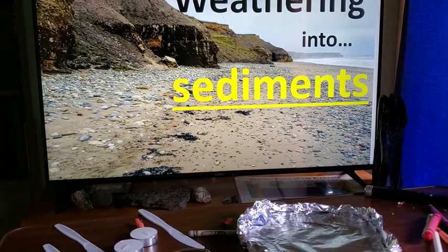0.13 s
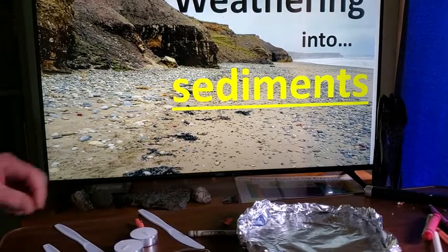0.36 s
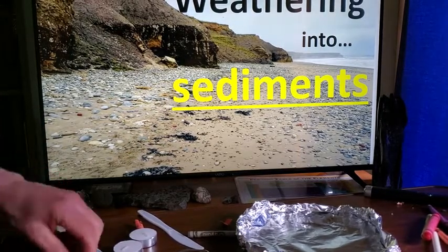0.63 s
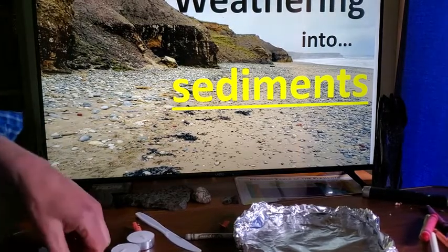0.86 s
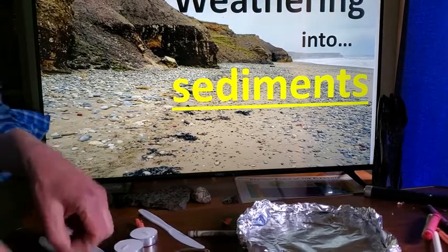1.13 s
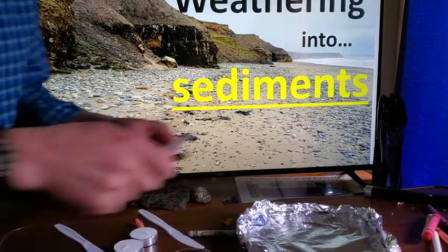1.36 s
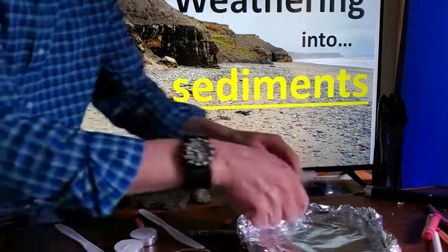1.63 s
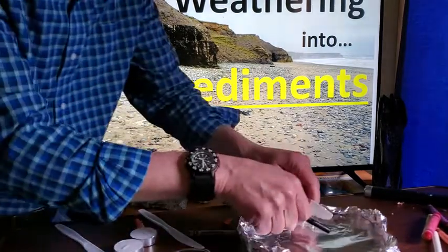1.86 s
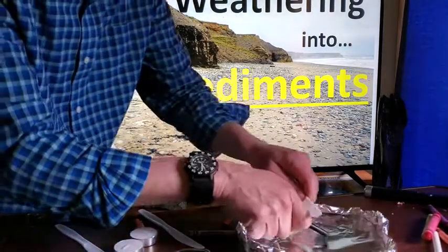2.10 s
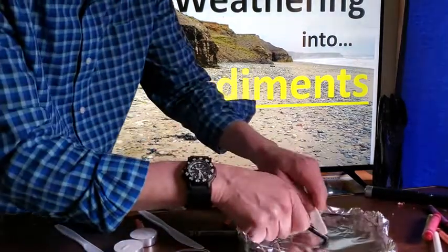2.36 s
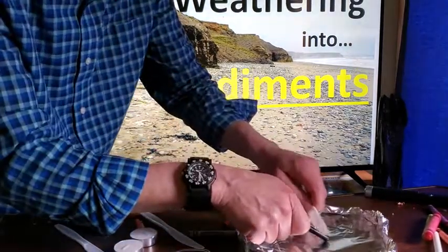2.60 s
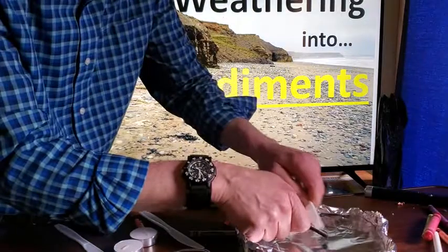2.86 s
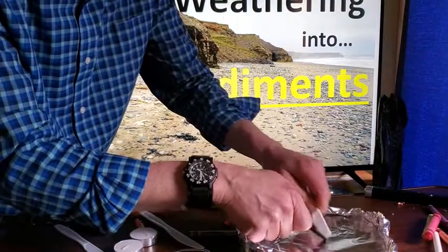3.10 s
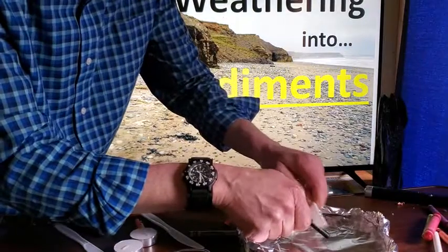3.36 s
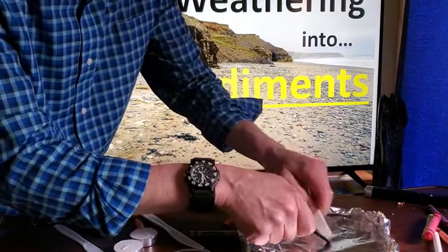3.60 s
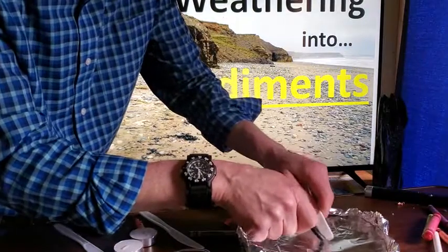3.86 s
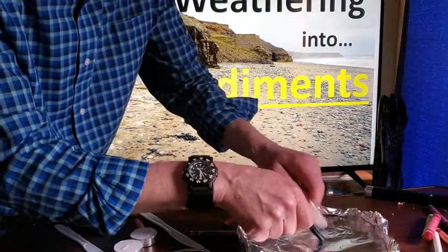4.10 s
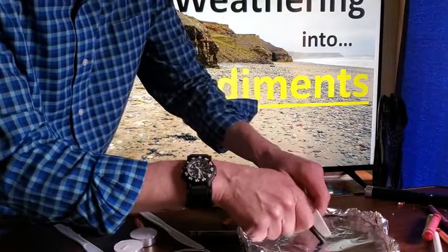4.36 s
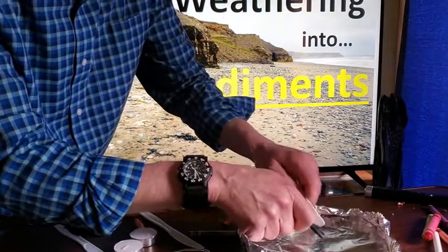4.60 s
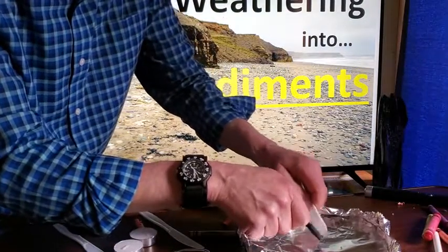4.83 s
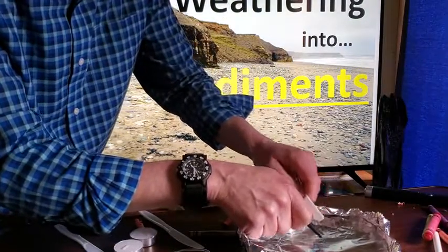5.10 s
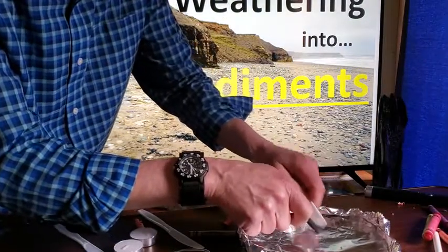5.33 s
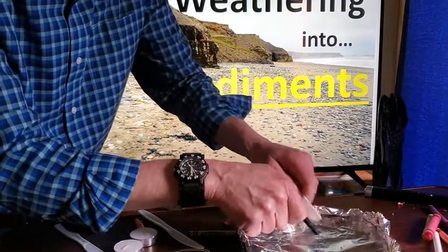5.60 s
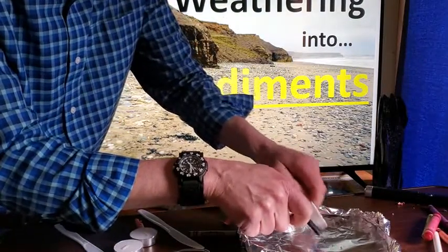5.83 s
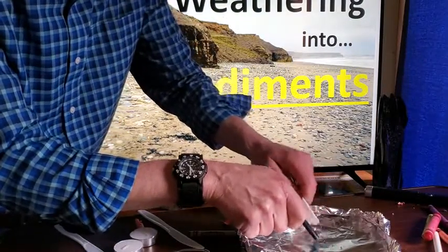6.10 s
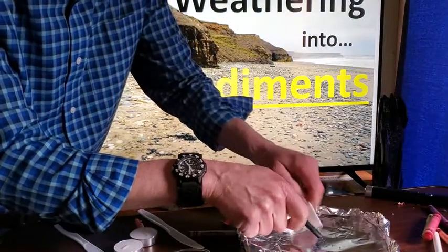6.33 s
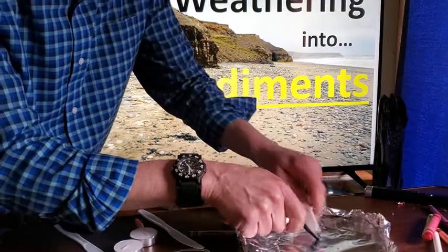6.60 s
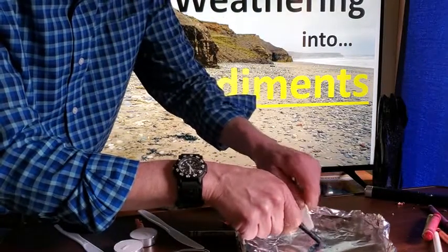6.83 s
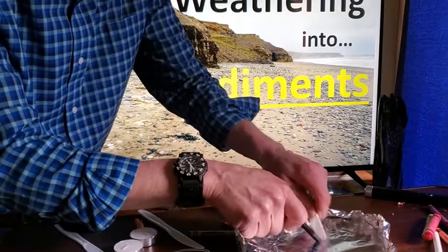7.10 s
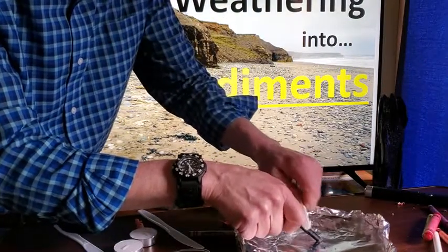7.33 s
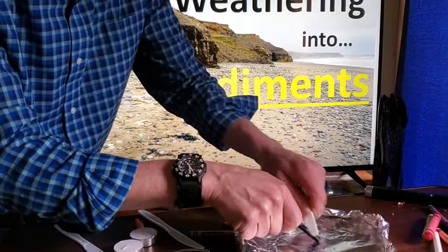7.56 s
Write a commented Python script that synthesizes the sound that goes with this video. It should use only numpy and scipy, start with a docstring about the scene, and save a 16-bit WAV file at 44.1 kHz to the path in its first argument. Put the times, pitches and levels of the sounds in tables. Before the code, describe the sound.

Close stereo microphones in a small furnished room, with soft hiss and a very faint low fan hum throughout, plus a barely audible wavering tone that fades by about 3 s. From 0 to 0.4 s, faint dragging and soft low table thuds. At 0.5-0.75 s, a loose cluster of light knocks, knuckle bumps and sliding plastic on wood; at 1.0-1.1 s, sharper, louder, bright plastic clacks. Soft low bumps follow near 1.4-1.5 s. From 1.8 s, a plastic knife scrapes wax on crumpled foil: strong rasps at first, settling into about six strokes a second, each a snap with gritty tearing and crinkly rustle. Between 3.7 and 6.1 s strokes are mostly lighter and more ticking, with tiny hollow moans around 5.2-5.9 s. A hard, bright bite comes near 6.46 s, then denser scraping continues to the end around 7.7 s.

```python
"""A plastic knife scrapes a wax crayon lying on crumpled foil, about six strokes a second, close to a pair of mics.
Each catch of the blade cracks in struck modes and a noise snap, then tears dense grains out of wax and foil.
Before that the knife is dragged off a table as grains through resonances, and clacks in two loose clusters.
The table thuds under the hands as resonant noise and short low tones.
A small furnished room adds dense echoes; behind it lie hiss, a fan hum and a faint wavering tone."""
import sys
import numpy as np
from scipy import signal
from scipy.fft import rfft, irfft
from scipy.io import wavfile

SR = 44100
rng = np.random.default_rng(int(sys.argv[2]) if len(sys.argv) > 2 else 0)


def convert_level_to_amplitude(level_db):
    """Map a level in decibels to its linear amplitude factor."""
    exponent = np.asarray(level_db, float) / 20
    return 10 ** exponent


def waveform_to_disk(signal):
    """Save audio, clipped to [-1, 1], as 16-bit WAV at the path in sys.argv[1]."""
    frames = np.transpose(np.atleast_2d(signal))
    scaled = np.clip(frames, -1, 1) * 32767
    samples = np.round(scaled).astype(np.int16)
    wavfile.write(sys.argv[1], SR, samples)


N = 339570   # samples, 7.7 s

# ringing modes of the plastic knife: f/Hz, relative level/dB, t60/s
KNIFE_MODES = [(756, -12.5, 0.015), (1305, -2, 0.05), (2260, -18, 0.014), (3125, -11.5, 0.048),
               (3427, -2, 0.029), (3733, 3, 0.021), (4000, -3, 0.029), (4220, -3, 0.021),
               (6880, -11, 0.0036)]
# resonances of the wooden table top: f/Hz, width/Hz, relative level/dB
WOOD_MODES = [(164, 67, -5.5), (308, 115, -0.5), (465, 94, 2), (747, 180, -3)]
# clacks of the knife on the table: t/s, relative strength level/dB, knock in the wood level/dB, favoured f/Hz
KNIFE_CLACKS = [(0.52, -49.5, -63, 3800), (0.562, -39, -42, 3500), (0.688, -42, -67, 4200),
                (0.999, -18, -37, 3700), (1.002, -22, -60, 3800), (1.054, -18.5, -41, 4200),
                (1.0598, -36, -60, 4220), (1.095, -30.5, -60, 3120), (1.113, -40.5, -50, 3100),
                (1.2307, -53.5, -73, 3920), (1.2996, -60, -90, 3700)]


def rms_one(x):
    """Scale to rms 1."""
    return x / np.sqrt(np.mean(x ** 2) + 1e-20)


def lowpass(x, hz):
    """Gentle first-order loss of treble."""
    return signal.lfilter(*signal.butter(1, hz, fs=SR), x)


def highpass(x, hz):
    """Second-order loss of bass."""
    return signal.sosfilt(signal.butter(2, hz, "high", fs=SR, output="sos"), x)


def in_time(rows):
    """Columns of a table as curves at every sample; the first column is t/s."""
    s, *columns = np.transpose(rows)
    return [np.interp(np.arange(N) / SR, s, column) for column in columns]


def impulses(times, peak_db):
    """One-sample blows at the given times, over a negligible floor."""
    clicks = np.full(N, 1e-18)
    clicks[np.round(np.array(times) * SR).astype(int)] = convert_level_to_amplitude(peak_db)
    return clicks


def colour(x, spectrum, share=1):
    """Causal (minimum-phase) filter that follows a spectrum, its dB multiplied by share."""
    hz, db = np.transpose(spectrum)
    grid_hz = np.maximum(np.fft.rfftfreq(4096, 1 / SR), 10)
    gain_db = share * np.interp(np.log(grid_hz), np.log(hz), db)
    cepstrum = irfft(np.log(convert_level_to_amplitude(gain_db)))
    # folding the cepstrum onto positive time makes the filter causal
    cepstrum[1:2048] *= 2
    cepstrum[2049:] = 0
    impulse_response = irfft(np.exp(rfft(cepstrum)))
    return signal.fftconvolve(x, impulse_response)[:N]


def resonances(x, peaks):
    """Parallel resonances of (f/Hz, width/Hz, level/dB), alternating in sign."""
    out = 0
    for k, (hz, width_hz, db) in enumerate(peaks):
        r = np.exp(-np.pi * width_hz / SR)
        poles = [1, -2 * r * np.cos(2 * np.pi * hz / SR), r * r]
        out = out + (-1) ** k * convert_level_to_amplitude(db) * signal.lfilter([1 - r, 0, r - 1], poles, x)
    return out


def drift(rate_hz):
    """Slow random wander of rms 1."""
    r = np.exp(-2 * np.pi * rate_hz / SR)
    slow = signal.lfilter([1], [1, -2 * r, r * r], rng.standard_normal(N + SR))[SR:]
    return rms_one(slow)


def grains(per_s, spread_db, clump_db):
    """Tiny clicks of uneven size that come in clumps; rms 1."""
    size_db = spread_db * np.minimum(rng.exponential(1, N), 3.5)
    sizes = convert_level_to_amplitude(size_db) * rng.choice([-1, 1], N)
    present = rng.random(N) < per_s / SR
    return rms_one(sizes * present * convert_level_to_amplitude(clump_db * drift(76)))


def bursts(start, length, db, rise_s, fade_db_per_s, rest_db):
    """Power of bursts that rise, hold and fade over a resting level; powers add."""
    power, t = np.full(N + SR, convert_level_to_amplitude(rest_db) ** 2), np.arange(SR // 2) / SR
    for s, hold, level_db in zip(start, length, db):
        at = round(s * SR)
        held = convert_level_to_amplitude(level_db - fade_db_per_s * np.maximum(t - hold, 0))
        power[at:at + len(t)] += ((1 - np.exp(-t / rise_s)) * held) ** 2
    return power[:N]


def scraping(rub_db, shake_db):
    """Wax tears in the mid range, foil rustles on top, the knife cracks at each catch and the wood answers."""
    # wax torn by the blade: f/Hz, relative level/dB per Hz
    wax_spectrum = [(120, -32), (200, -63), (443, -13), (581, -9.5), (682, -2), (1080, -0.5), (1420, 1),
                    (2730, 0), (3410, -1.5), (4990, -16.5), (9000, -16), (11700, -52), (19800, -120)]
    # crumpled foil rustling: f/Hz, relative level/dB per Hz
    foil_spectrum = [(880, -46), (1500, -13.5), (2360, -8), (3930, -1), (7620, -6.5), (11200, -4),
                     (13000, -10.5), (15200, -4), (16500, -52)]
    # the pressed blade rings with the tearing: f/Hz, width/Hz, level/dB
    pressed_blade = [(1438, 116, -3.5), (3435, 160, 5.5)]
    # the blade springs free of a notch: t/s, relative ring level/dB, relative snap level/dB
    spring_times = [(1.8248, -33.5, -37), (2.179, -41, -44), (2.355, -35.5, -48), (2.5404, -36, -61),
                    (2.641, -45, -61), (2.7286, -30, -52), (2.807, -39, -53), (3.2965, -50, -51),
                    (3.4184, -50.5, -53), (3.458, -52, -44.5), (3.7364, -38, -53.5), (3.8767, -61, -62.5),
                    (4.225, -50, -80), (4.2779, -49.5, -49), (4.5524, -36.5, -69), (5.1046, -59, -49.5),
                    (6.1072, -57.5, -48), (6.4682, -45, -37), (6.9004, -40.5, -50), (7.0892, -40, -55),
                    (7.243, -43, -70), (7.261, -41, -68), (7.422, -43, -72), (7.518, -64, -62),
                    (7.5911, -36.5, -64)]
    wax_apart, foil_apart = 0.67, 0.39   # share of grain power that each microphone hears on its own
    bounce_s, bounce_db = 0.0064, -6.5   # the blade touches twice

    wax_level = np.sqrt(bites(column=2, rise_s=0.0026, stretch=1.0) + convert_level_to_amplitude(rub_db) ** 2)
    foil_level = np.sqrt(bites(column=3, rise_s=0.0042, stretch=0.83) + convert_level_to_amplitude(rub_db + 5.0) ** 2)
    wax_streams = torn(wax_spectrum, 3500, 5.26, convert_level_to_amplitude(-1.5) * wax_level)
    wax, *wax_own = [stream + resonances(stream, pressed_blade) for stream in wax_streams]
    foil, *foil_own = torn(foil_spectrum, 5800, 4.8, foil_level)

    shake = convert_level_to_amplitude(shake_db) * np.sqrt(bites(column=2, rise_s=0.0056, stretch=1.05))
    wood_grains = grains(900, spread_db=6.0, clump_db=4.0)
    wood = highpass(shake * rms_one(resonances(wood_grains, WOOD_MODES)), 230)

    s, crack_db, wax_db, foil_db = catches().T[:4]
    # a catch in the foil snaps, one in the wax rings the blade
    in_foil_db = np.clip(0.49 * (foil_db - wax_db), -8, 8)
    cracks = struck(s, crack_db - 34.0 - in_foil_db, tilt_db=8.0)
    cracks = cracks + snaps(s, crack_db - 30.5 + in_foil_db, t60=0.0069)
    cracks = cracks + convert_level_to_amplitude(bounce_db) * np.roll(cracks, round(bounce_s * SR))

    free, ring_db, snap_db = np.transpose(spring_times)
    springs = struck(free, ring_db - 2.5, tilt_db=4.0) + snaps(free, snap_db, t60=0.0037)

    shared_grains = np.sqrt(1 - wax_apart) * wax + np.sqrt(1 - foil_apart) * foil
    own = np.sqrt(wax_apart) * np.array(wax_own) + np.sqrt(foil_apart) * np.array(foil_own)
    return shared_grains + wood + cracks + springs + moans(), own


def catches():
    """Every catch of the blade as (t/s, crack/dB, wax/dB, foil/dB, length/s); longer bites crack harder."""
    # the blade bites into the wax: t/s, relative wax tearing level/dB, relative foil rustle level/dB, length/s
    bite_times = [(1.7897, -45.5, -40, 0.059), (1.814, -40.5, -49, 0.073), (2.177, -34.5, -29, 0.028),
                  (2.2558, -36.5, -28.5, 0.028), (2.35, -39, -43.5, 0.04), (2.427, -42.5, -44, 0.027),
                  (2.538, -34.5, -54, 0.012), (2.561, -40.5, -38.5, 0.032), (2.5896, -35, -34.5, 0.024),
                  (2.64, -35.5, -42, 0.012), (2.726, -42, -49, 0.056), (2.797, -37, -42.5, 0.024),
                  (2.889, -60, -46, .03), (2.904, -40, -45, 0.037), (2.963, -43.5, -32, 0.014),
                  (3.0712, -41.5, -36.5, 0.028), (3.094, -48, -43, 0.027), (3.287, -60, -46.5, 0.025),
                  (3.423, -43, -61, 0.029), (3.457, -47.5, -42.5, 0.036), (3.573, -45, -60, 0.03),
                  (3.733, -38, -54, 0.018), (4.053, -62, -45, 0.073), (4.07, -47.5, -38.5, 0.032),
                  (4.105, -40, -36, 0.019), (4.23, -45.5, -57, 0.036), (4.398, -39.5, -37.5, 0.044),
                  (4.549, -36, -38, 0.036), (5.101, -59, -43.5, 0.028), (5.497, -58.5, -53.5, 0.077),
                  (5.674, -73, -47.5, 0.038), (6.201, -50, -45, 0.067), (6.219, -41, -31.5, 0.053),
                  (6.459, -37.5, -32, 0.026), (6.4634, -32.5, -25.5, 0.018), (6.55, -33.5, -29, 0.021),
                  (6.662, -49, -54, 0.067), (6.686, -42, -52, 0.018), (6.73, -51, -50.5, 0.043),
                  (6.8027, -46.5, -42.5, 0.024), (6.895, -49, -54, 0.031), (6.909, -44.5, -45, 0.11),
                  (6.968, -42.5, -51, 0.054), (7.074, -52, -60, 0.088), (7.091, -41, -55, 0.025),
                  (7.151, -40, -46, 0.022), (7.227, -49.5, -47.5, 0.033), (7.243, -44, -51, 0.088),
                  (7.4113, -46.5, -49, 0.05), (7.514, -36.5, -51, 0.017), (7.59, -31.5, -41, 0.018)]
    # the blade misses the wax and brushes the foil: t/s, relative tick level/dB, relative foil rustle level/dB
    brush_times = [(3.043, -58, -45.5), (3.233, -68, -54.5), (3.3856, -38.5, -50.5), (3.715, -35, -49),
                   (3.876, -28, -51.5), (4.0333, -35, -53), (4.2782, -31, -58), (4.356, -42, -44),
                   (4.526, -40, -54), (4.685, -34, -52.5), (4.766, -32.5, -49), (4.8682, -38, -57.5),
                   (4.9411, -31, -61), (5.009, -55, -50), (5.04, -46, -56), (5.189, -68, -53),
                   (5.351, -36.5, -55), (5.432, -32.5, -51.5), (5.613, -31, -59), (5.6965, -38, -48.5),
                   (5.725, -60, -51.5), (5.771, -36, -61), (5.8477, -37, -55), (5.873, -36.5, -57),
                   (5.937, -36.5, -56.5), (6.0424, -41, -61), (6.101, -42, -52), (6.362, -35.5, -56),
                   (6.426, -40, -54), (7.681, -36, -49.5)]
    crack_db, crack_db_per_doubling = 8, 12   # over the louder of wax and foil; per doubled bite length
    brush_s, brush_wax_db = 0.06, -22   # the wax is barely touched

    rows = []
    for s, wax, foil, length in bite_times:
        crack = max(wax, foil) + crack_db + crack_db_per_doubling * np.log2(length / brush_s)
        rows.append((s, crack, wax, foil, length))
    for s, tick, foil in brush_times:
        rows.append((s, tick, foil + brush_wax_db, foil, brush_s))
    return np.array(rows)


def bites(column, rise_s, stretch):
    """Power of the catches: each bites at once, holds a moment and lets go; powers add."""
    power, t = np.zeros(N + SR), np.arange(SR // 3) / SR
    for row in catches():
        at = round(row[0] * SR)
        let_go = np.exp(-(t / (stretch * max(row[4], .004))) ** 1.315)
        shape = (1 - np.exp(-t / rise_s)) * let_go
        power[at:at + len(t)] += (convert_level_to_amplitude(row[column]) * shape) ** 2
    return power[:N]


def torn(spectrum, per_s, spread_db, level):
    """Three unrelated streams of grains that stick and slip together: shared, left only, right only."""
    level = level * convert_level_to_amplitude(3.13 * drift(33.0))
    streams = []
    for _ in range(3):
        stream = colour(grains(per_s, spread_db, clump_db=0.0), spectrum)
        streams.append(level * rms_one(stream))
    return streams


def struck(times, peak_db, tilt_db, favour_hz=3400):
    """Every blow strikes each mode of the knife with a strength of its own; tilt is dB per octave."""
    favour_db, favour_octaves = 10, 0.11   # the spot struck favours the modes near one pitch
    out = 0
    luck = rng.standard_normal((len(times), len(KNIFE_MODES)))
    for k, (hz, db, t60) in enumerate(KNIFE_MODES):
        near_db = favour_db * np.exp(-(np.log2(hz / favour_hz) / favour_octaves) ** 2)
        mode_db = db + near_db + tilt_db * np.log2(hz / 3500)
        clicks = impulses(times, peak_db + mode_db + 2.0 * luck[:, k])
        r, w = convert_level_to_amplitude(-60 / (t60 * SR)), 2 * np.pi * hz / SR
        out = out + signal.lfilter([0, np.sin(w)], [1, -2 * r * np.cos(w), r * r], clicks)
    return out


def snaps(times, peak_db, t60):
    """A puff of bright noise a few milliseconds long at each blow."""
    softened = signal.lfilter([.05], [1, -.95], impulses(times, peak_db)) * 20
    puff = signal.lfilter([1], [1, -convert_level_to_amplitude(-60 / (t60 * SR))], softened)
    return puff * highpass(rng.standard_normal(N), 1800)


def moans():
    """Short hollow moans of the blade on the wax: rough rubbing passed twice through one resonance."""
    # one moan a stroke: t/s, level/dB before the microphones
    moan_times = [(5.2, -67.5), (5.37, -66.5), (5.54, -63), (5.7, -56), (5.87, -66.5)]
    hollow = [(635, 190, 0)]   # f/Hz, width/Hz, level/dB
    s, db = np.transpose(moan_times)
    rub = rms_one(resonances(resonances(rng.standard_normal(N), hollow), hollow))
    return np.sqrt(bursts(s, 0 * s + 0.021, db, 0.0038, 570, -np.inf)) * rub


def handling(wood_db, sliding_db, skid_db):
    """The knife is dragged over the wood, ringing a few modes, and clacks down."""
    # broad colour of plastic sliding on wood: f/Hz, relative level/dB per Hz
    slide_spectrum = [(530, 3), (900, -4), (1940, 3.5), (5590, 1.5), (7480, -4.5), (15300, -2),
                      (16500, -38)]
    # resonances of the sliding: f/Hz, width/Hz, relative level/dB
    slide_modes = [(1300, 86, 2.5), (1963, 146, 7), (2490, 170, -2)]

    rub = grains(4000, spread_db=3.5, clump_db=5.0)
    ringing_slide = 0.91 * rms_one(resonances(rub, slide_modes))
    slide = rms_one(rms_one(colour(rub, slide_spectrum)) + ringing_slide)
    wood = rms_one(resonances(grains(900, spread_db=0.0, clump_db=4.5), WOOD_MODES))

    # the knife's modes as resonances, their widths following from t60
    blade_modes = [(hz, np.log(1000) / (np.pi * t60), db + 3.8 * np.log2(hz / 3500))
                   for hz, db, t60 in KNIFE_MODES]
    skid = rms_one(resonances(rub, blade_modes)) + 0.9 * rms_one(highpass(rub, 4000))
    dragged = convert_level_to_amplitude(skid_db) * skid + convert_level_to_amplitude(sliding_db) * slide + convert_level_to_amplitude(wood_db) * wood

    s, db, _, hz = np.transpose(KNIFE_CLACKS)
    clacks = struck(s, db - 11.0, tilt_db=-1.0, favour_hz=hz) + snaps(s, db - 22.5, t60=0.013)
    return dragged + thumps() + clacks


def hands():
    """Rumble, sliding and skidding in dB: long drags, and a short knock and skid at each clack."""
    # hands and knife dragged over the table: t/s, length/s, wood rumble level/dB, sliding level/dB
    drag_times = [(0.11, 0.17, -69, -65.5), (0.233, 0.14, -60, -64.5), (0.558, 0.031, -43.5, -46),
                  (0.623, 0.22, -60, -49.5), (0.681, 0.046, -50.5, -46), (1.058, 0.031, -55.5, -51.5),
                  (1.37, 0.097, -64.5, -76), (1.536, 0.022, -67, -92)]
    rise_s, fade_db_per_s = 0.0025, 232
    s, length, wood_db, sliding_db = np.transpose(drag_times)
    hit, peak_db, knock_db = np.transpose(KNIFE_CLACKS)[:3]
    wood = bursts(s, length, wood_db, rise_s, fade_db_per_s, rest_db=-70.5)
    wood = wood + bursts(hit, 0 * hit, knock_db, 0.00051, 644, -np.inf)
    sliding = bursts(s, length, sliding_db, rise_s, fade_db_per_s, rest_db=-82)
    skid = bursts(hit, 0 * hit, peak_db - 15.5, .0006, 382, -100)   # a clack also skids a little
    return 10 * np.log10([wood, sliding, skid])


def thumps(contact_hz=900, gain_db=41.0):
    """Soft blows set the resonances of the wood ringing."""
    # knuckles and handle on the table top: t/s, relative level/dB
    thump_times = [(0.570, -38), (0.576, -37), (0.592, -39), (0.707, -34.5), (0.729, -39), (0.747, -44),
                   (1.551, -54.5)]
    s, db = np.transpose(thump_times)
    return resonances(lowpass(-impulses(s, db + gain_db), contact_hz), WOOD_MODES)


def table(thud_db):
    """The table top swings in its two lowest modes under the rubbing, and when leaned on."""
    # lowest modes of the table top: f/Hz, width/Hz, relative level/dB
    low_modes = [(50, 7.2, 11), (90, 6.7, 21)]
    # weight put on the table top, which swings for a moment: t/s, length/s, f/Hz, level/dB
    lean_times = [(.02, 0.31, 149.5, -66), (.12, 0.11, 50.6, -52.5), (.22, 0.1, 58.4, -57),
                  (.53, 0.055, 89, -67), (.68, 0.071, 55.6, -44.5), (.78, 0.069, 92.2, -55),
                  (.96, 0.099, 98, -45), (1.03, 0.1, 90, -58.5), (1.36, 0.13, 56, -43.5),
                  (1.52, 0.065, 61, -66)]
    thuds = convert_level_to_amplitude(thud_db) * rms_one(resonances(rng.standard_normal(N), low_modes))
    return thuds + swings(lean_times, waver=0.15)


def swings(rows, waver):
    """Short tones that swell and stop, a little unsteady in pitch."""
    out, t = np.zeros(N), np.arange(N) / SR
    wander = np.cumsum(1 + waver * drift(30)) / SR   # unsteady time
    for s, length, hz, db in rows:
        part = slice(round(s * SR), round((s + length) * SR))
        shape = np.sqrt(np.abs(np.sin(np.pi * (t[part] - s) / length)))
        out[part] += convert_level_to_amplitude(db) * shape * np.sin(2 * np.pi * hz * (wander[part] - wander[part][0]))
    return out


def room(x):
    """Dense echoes dying away, different at each microphone, duller as they age, new for each place of the hands."""
    place_s = .2   # the hands shift, and the echoes with them
    t60_s, wall_cut_hz = 0.21, 6400
    t, hop = np.arange(SR // 3) / SR, round(place_s * SR)
    out = np.zeros((2, N + 4 * hop + len(t)))
    padded = np.pad(x, (hop, 2 * hop))
    fade = np.sqrt(np.hanning(2 * hop))   # neighbouring places overlap with constant power
    for at in range(0, N + hop, hop):
        noise = rng.standard_normal((2, len(t)))
        dull = lowpass(noise, wall_cut_hz)
        ageing = dull + (noise - dull) * np.exp(-t / 0.064)
        tail = ageing * convert_level_to_amplitude(-60 * t / t60_s) * (1 - np.exp(-t / 0.0011))
        tail = tail / np.sqrt(np.sum(tail ** 2, axis=1, keepdims=True))
        echo = signal.fftconvolve((padded[at:at + 2 * hop] * fade)[None], tail, axes=1)
        out[:, at:at + echo.shape[1]] += echo
    return out[:, hop:hop + N]


def background():
    """Air and microphone hiss, unlike on the two sides in the treble, a fan hum and a faint wavering tone."""
    # air and microphone hiss: f/Hz, relative level/dB per Hz
    air_spectrum = [(18, -70), (30, -8.5), (86, -11), (298, -19), (443, -15), (593, -12), (1150, -16),
                    (2740, -20), (3570, -12), (5440, -14), (7670, -24.5), (15200, -23.5), (16500, -41)]
    # the faint tone sinks, returns and dies away: t/s, level/dB
    tone_levels = [(0, -70), (.35, -104), (1.2, -75), (2.2, -73.5), (2.7, -76), (3.2, -110)]
    common, left, right = (colour(v, air_spectrum) for v in rng.standard_normal((3, N)))
    own = np.array([left, right])
    air = rms_one(own + lowpass(0.13 * common - 0.12 * own, 900))   # the bass is partly shared
    hum = rms_one(resonances(rng.standard_normal(N), [(88, 6, 0)]))
    tone = rms_one(resonances(rng.standard_normal(N), [(444.5, 15, 0)]))
    return convert_level_to_amplitude(-68.5) * air + convert_level_to_amplitude(-83.5) * hum + convert_level_to_amplitude(in_time(tone_levels)[0]) * tone


def scene():
    """Scraping reaches the right microphone first, handling the left; the two ports colour scraping differently."""
    # under the rubbing: t/s, table thud level/dB, how much each catch shakes the wood level/dB
    rubbing = [(1.78, -65, -10.5), (2.14, -86, -13.5), (2.73, -74, -12), (3.97, -83.5, -4.5),
               (4.5, -77.5, -20), (5.95, -92, -8), (6.5, -85, -23.5), (6.95, -81.5, -5), (7.35, -78, -17.5),
               (7.7, -74, -18)]
    # colour of the left microphone against the right: f/Hz, level/dB, applied in part on each side
    left_over_right = [(60, -7), (120, -11), (240, -14.5), (480, 5), (950, -2.5), (1890, 6.5), (3770, 8.5),
                       (6000, 5.5), (9000, -8), (14000, -6)]
    left_lag, hands_lag = 4, 11   # samples
    light_rub_db = -80.5   # rubbing between the catches, before the microphones
    bass_alike, bass_alike_hz = 0.42, 890   # close microphones hear the bass alike

    before = np.arange(N) < rubbing[0][0] * SR
    thud_db, shake_db = in_time(rubbing)
    shared, own = scraping(np.where(before, -120, light_rub_db), shake_db)
    handled = handling(*hands()) * before * convert_level_to_amplitude(np.array([[2.0], [-2.0]]))   # the hands come from the left

    left = colour(np.roll(shared, left_lag) + own[0], left_over_right, share=0.73) + handled[0]
    right = colour(shared + own[1], left_over_right, share=-0.18) + np.roll(handled[1], hands_lag)
    thud = table(np.where(before, -80, thud_db)) * convert_level_to_amplitude(np.array([[-1.2], [1.2]]))
    echo = convert_level_to_amplitude(-7.5) * room(shared + own[0] + handled[0])

    both = convert_level_to_amplitude(-6.0) * np.array([left, right]) + echo + background()
    bass_side = lowpass((both[0] - both[1]) / 2, bass_alike_hz)
    return both - bass_alike * bass_side * np.array([[1], [-1]]) + thud


def low_pass(x):
    """Removes everything above the highest recorded frequency."""
    return signal.sosfilt(signal.butter(12, 17150, fs=SR, output="sos"), x)


def record(dry):
    """A narrow lift near 15 kHz, then a steep roll-off above 16 kHz."""
    lift = np.array([resonances(side, [(15300, 740, -12.5)]) for side in dry])
    roll_off = signal.ellip(6, .5, 22.0, 16100, fs=SR, output="sos")
    mix = signal.sosfilt(roll_off, dry + lift)
    return low_pass(mix)


dry = scene()
out = record(dry)
waveform_to_disk(out)
```